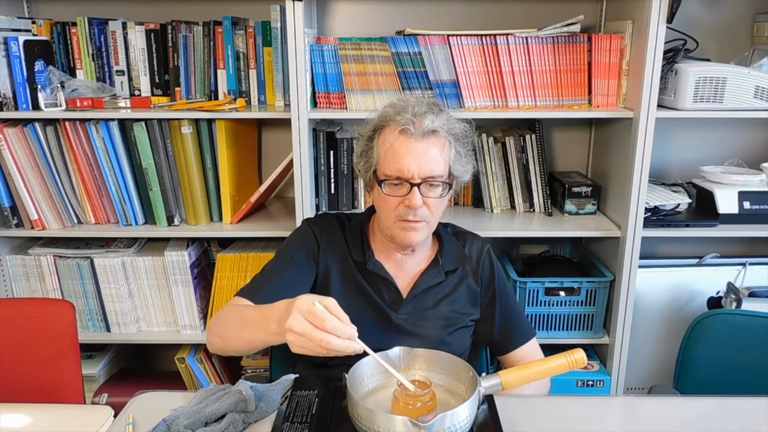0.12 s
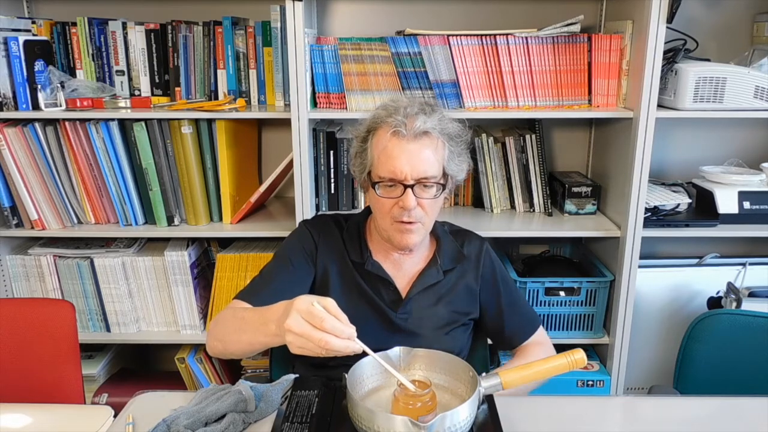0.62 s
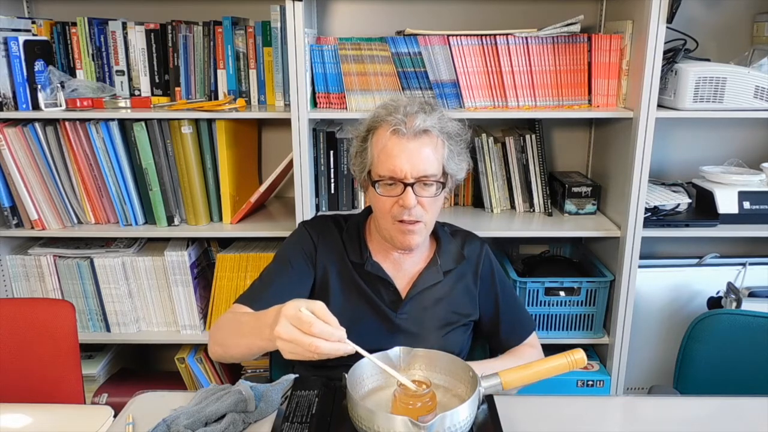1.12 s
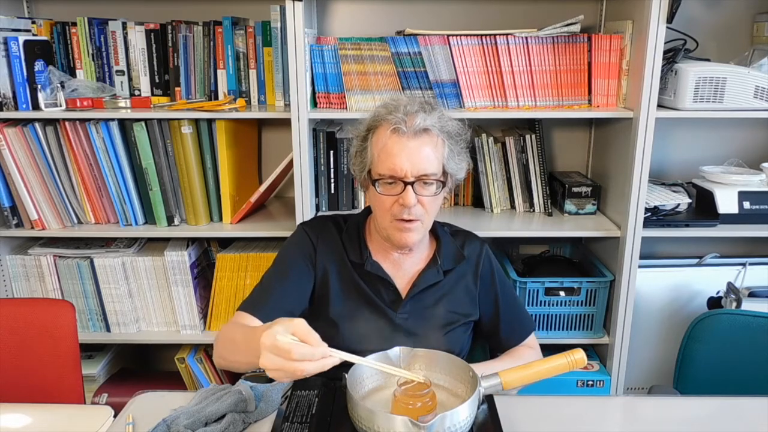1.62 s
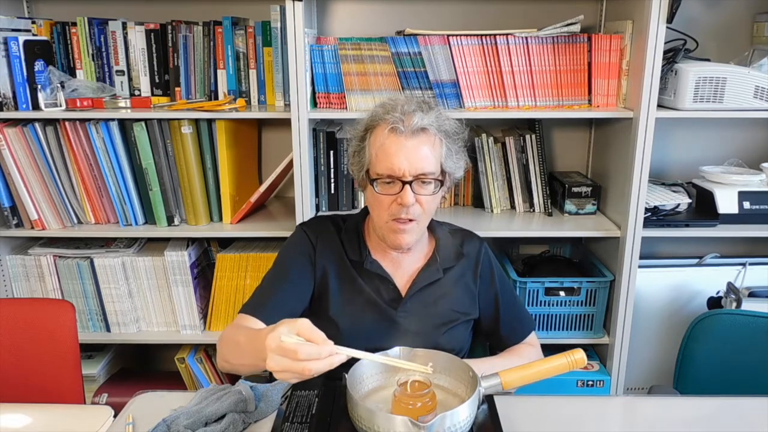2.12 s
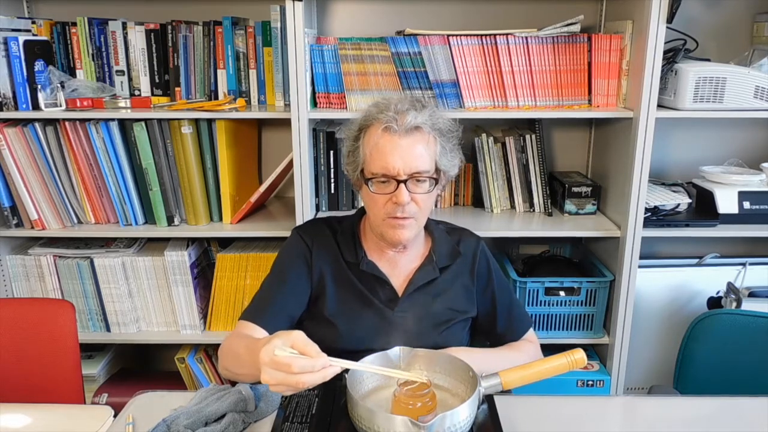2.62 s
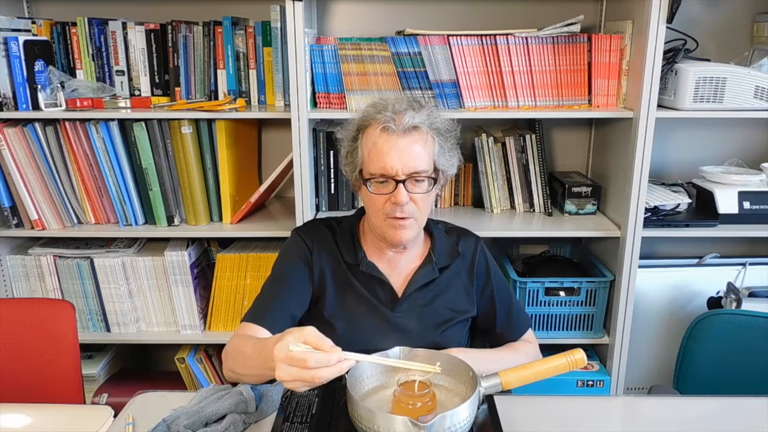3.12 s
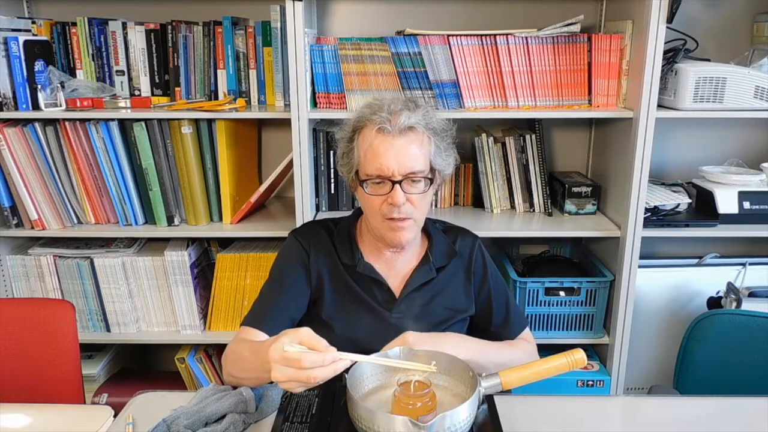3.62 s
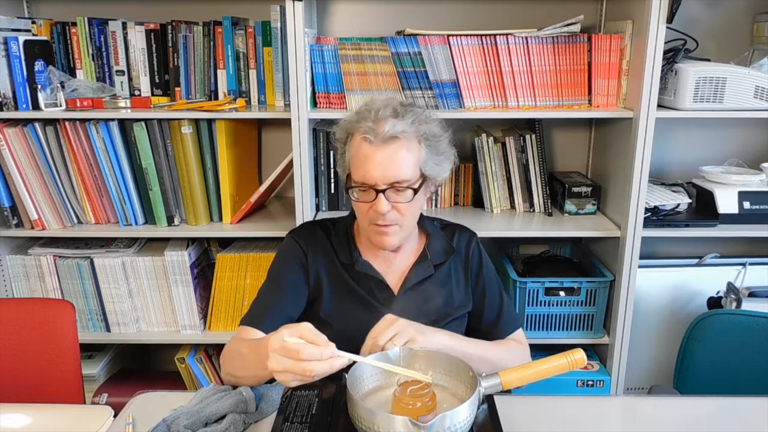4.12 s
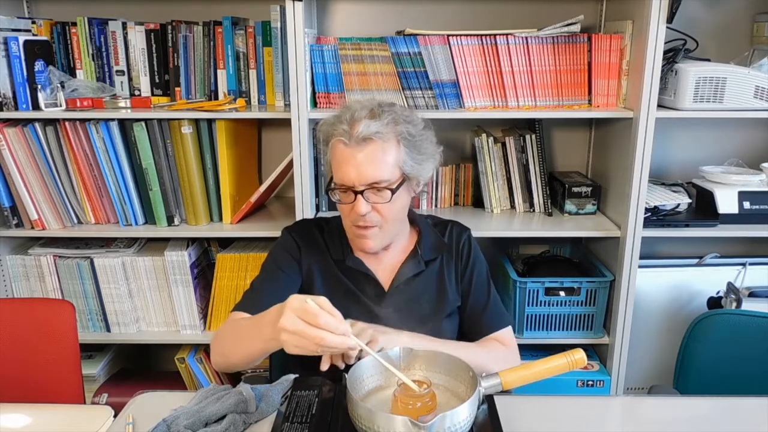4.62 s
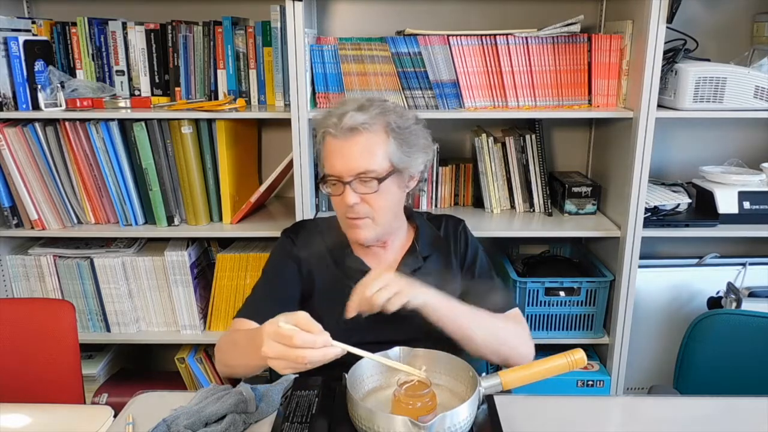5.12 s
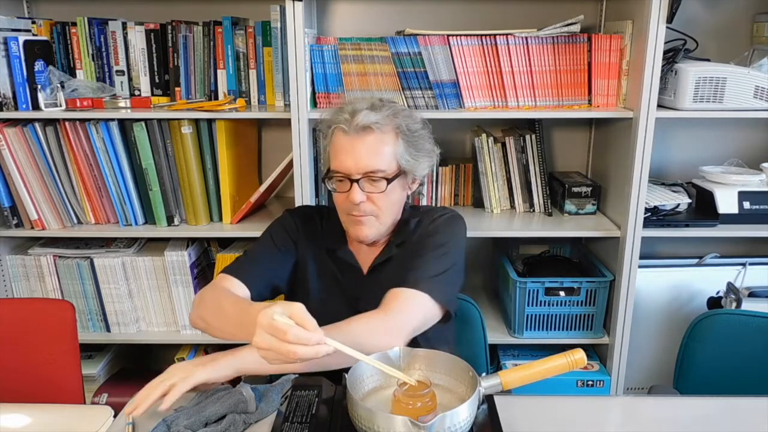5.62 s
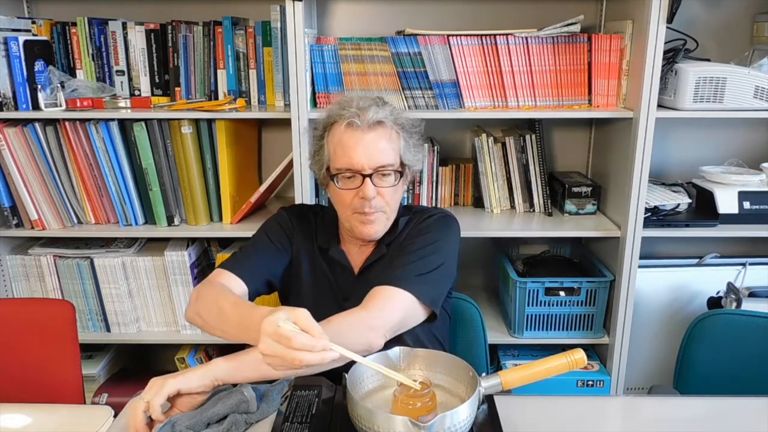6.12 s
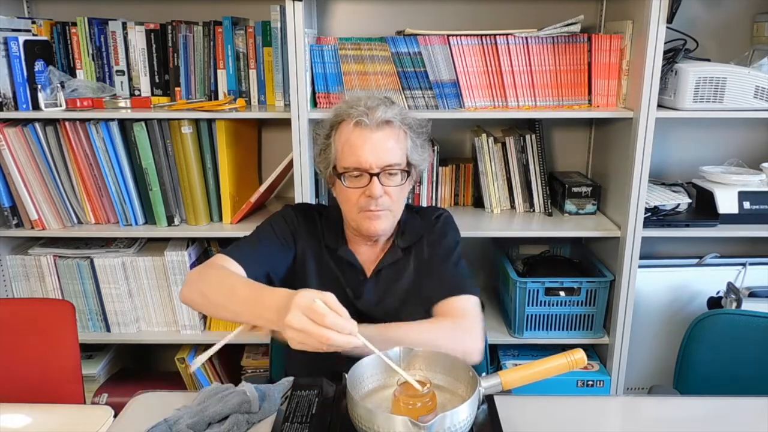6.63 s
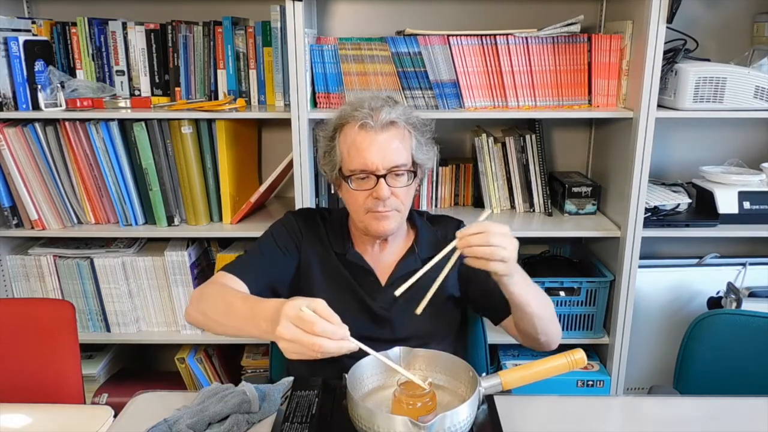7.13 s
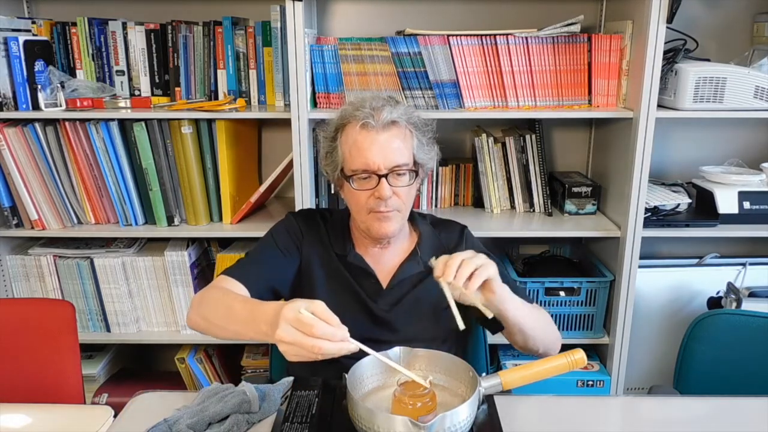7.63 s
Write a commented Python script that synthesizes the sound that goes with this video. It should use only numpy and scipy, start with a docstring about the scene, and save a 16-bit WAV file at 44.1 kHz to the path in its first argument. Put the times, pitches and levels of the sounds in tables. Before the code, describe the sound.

Steady bubbling and soft burner hiss fill the sound, close and dry with a slight small-room reflection. Irregular watery plops, dull pot clinks and crisp little spits stand out, liveliest near four seconds. Faint hum and room rumble lie underneath. At about six seconds wooden chopsticks tap the desk and a deep, almost subsonic flutter swells, then fades as a quick run of plops comes around seven seconds.

```python
"""Bubbles plop and droplets spit over the hiss of a gas flame: water simmers in a thin metal pot
on a small stove, close to a two-port camera microphone. Damped tones make the bubbles and taps,
noise bursts the spits, shaped noise the flame; a bank of modes rings as the pot. A machine hums in
the rumbling room, a hand knocks chopsticks on the desk, and late on comes a very low wobble."""
import sys
import numpy as np
from scipy import signal
from scipy.fft import rfft, irfft, next_fast_len
from scipy.io import wavfile
from scipy.ndimage import uniform_filter1d

SR = 44100
rng = np.random.default_rng(int(sys.argv[2]) if len(sys.argv) > 2 else 0)


def digitize_waveform(pressure):
    """Quantize a signal to 16-bit integers and store it at the path in sys.argv[1].

    Rows of a 2-D input are taken as channels; values are limited to [-1, 1].
    """
    field = np.atleast_2d(pressure).T
    bounded = np.clip(field, -1, 1)
    quanta = np.round(bounded * 32767).astype(np.int16)
    wavfile.write(sys.argv[1], SR, quanta)


def gain_from_db(level_db):
    """Convert decibel levels to linear amplitude factors (20 dB per decade)."""
    decades = np.asarray(level_db, float) / 20
    return 10 ** decades


N = 341803  # length in samples
SIZE = next_fast_len(N)
HZ = np.fft.rfftfreq(SIZE, 1 / SR)
T = np.arange(N) / SR


def evened(x):
    """Scales to rms 1."""
    return x / np.sqrt(np.mean(x ** 2) + 1e-20)


def read(points, hz):
    """Reads a curve of (Hz, value) points on a log frequency axis."""
    point_hz, value = np.transpose(points)
    return np.interp(np.log(hz + 1), np.log(point_hz + 1), value)


def add(mix, s, sound):
    """Mixes a sound in at s seconds."""
    part = mix[round(s * SR):][:len(sound)]
    part += sound[:len(part)]


def coloured(x, db):
    """Weights the whole spectrum of x by a gain in dB for each frequency of HZ."""
    return irfft(rfft(x, SIZE) * gain_from_db(db), SIZE)[..., :N]


def band(x, hz, octaves):
    """Passes a band of the given width around hz."""
    edges = hz * 2. ** np.array([-octaves / 2, octaves / 2])
    edges = np.clip(edges, 20, SR / 2.2)
    return signal.sosfilt(signal.butter(3, edges, "bandpass", fs=SR, output="sos"), x)


# vigour of the boil, used about its mean: start_s [s], level_db [dB]
BOIL_VIGOUR = [(0.0, -46.5), (1.55, -48.5), (1.75, -47), (3.32, -48), (3.91, -44), (4.9, -49.5), (5.1, -47),
               (5.44, -46), (5.89, -48.5), (6.06, -47.5), (6.54, -48.5), (7.75, -45)]


def vigour_db():
    """Level of the boil about its mean, sample by sample."""
    level_db = np.interp(T, *np.transpose(BOIL_VIGOUR))
    return level_db - level_db.mean()


# modes of the thin metal pot: pitch_hz [Hz], width_hz [Hz], level_db [dB over the broad colour]
POT_MODES = [(518, 47, 5.5), (650, 52, 5.5), (747, 44, 4), (1030, 61, 7.5), (1139, 29, 8), (1360, 59, 5),
             (1526, 34, 3.5), (1708, 13, 6.5), (2126, 165, 5), (2885, 55, 8.5), (2924, 30, 7),
             (3135, 80, 7.5), (3395, 40, 6.5), (3560, 28, 7), (3770, 35, 8.5), (3920, 69, 6.5),
             (6520, 45, -4), (6990, 110, 3), (8130, 120, 3.5), (5040, 38, 5)]


def pot_rings(x, ring_db):
    """The direct sound plus every resonance of the pot, signs alternating."""
    modes = 0
    for k, (hz, width, db) in enumerate(POT_MODES):
        modes = modes + (-1) ** k * gain_from_db(db) * width / (width + 2j * (HZ - hz))
    response = 1 + gain_from_db(ring_db) * modes
    return irfft(rfft(x, SIZE) * response, SIZE)[..., :N]


def bubble(hz, t60, glide):
    """A damped tone, rising for a positive glide as when a bubble nears the surface."""
    t = np.arange(round(t60 * SR) + 50) / SR
    envelope = (1 - np.exp(-t / 0.00096)) * gain_from_db(-60 * t / t60)
    return envelope * np.sin(2 * np.pi * hz * t * (1 + glide * t / t60))


def simmer(level_db=-55, per_s=14, spread_db=3, cycles=11):
    """Many small bubbles, mostly low, in clumps when the boil is lively; the pot rings with them."""
    out = np.zeros(N)
    chance = per_s / SR * gain_from_db(0.92 * vigour_db())  # per sample, at each of the 24 pitches
    for hz in np.geomspace(450, 2600, num=24):
        size = gain_from_db(spread_db * np.minimum(rng.exponential(1, N), 4))
        size = size * (rng.random(N) < chance)
        tone = bubble(hz, cycles / hz, 0.21) * (600 / hz) ** .5  # low ones are louder
        out += signal.oaconvolve(size, tone)[:N]
    return gain_from_db(level_db) * evened(pot_rings(out, -1.7))


# bubble plops, taps and clinks at the pot, with the body of the chopstick knocks:
# start_s [s], level_db [dB], pitch_hz [Hz], knock_db [dB], second_pitch_hz [Hz]
BLOWS = [(.115, -35, 1020, -19, 700), (.412, -41, 1110, -30, 4500), (.4215, -37, 1200, -22, 1800),
         (.432, -47, 2090, -31, 1300), (.934, -36, 1560, -35, 2370), (.941, -32, 1090, -35, 1520),
         (1.512, -31.5, 1450, -26, 900), (1.715, -31.5, 650, -29, 1680), (1.763, -35, 760, -29, 1100),
         (1.777, -38, 1660, -33, 780), (1.831, -35, 1030, -31, 1450), (1.885, -35, 1130, -38, 1500),
         (2.12, -29.5, 1495, -31, 2250), (2.121, -32, 673, -30, 990), (2.13, -43, 1470, -36, 2400),
         (2.2, -31, 1030, -26, 1510), (2.2015, -43, 2780, -33, 5180), (2.425, -37, 1454, -24, 1030),
         (2.524, -33, 685, -22, 1080), (3.705, -38.5, 1480, -34, 1040), (3.889, -36, 1000, -21, 1600),
         (4.05, -36, 3660, -24, 1990), (4.082, -32, 1030, -29, 1500), (4.969, -36, 1600, -28, 2430),
         (5.046, -40, 900, -25, 1450), (5.06, -34, 1000, -26, 1420), (5.177, -32, 910, -31, 650),
         (5.43, -37, 1430, -29, 1000), (5.47, -34, 980, -19, 630), (6.046, -42, 700, -26, 1540),
         (6.075, -44, 900, -27, 2570), (6.3, -38, 1030, -26, 1710), (6.902, -33, 770, -37, 1340),
         (7.062, -35, 1080, -24, 1550), (7.149, -31, 1100, -23.5, 1600), (7.25, -33, 700, -28, 1980),
         (7.345, -35, 1030, -24, 1850)]


def blows(t60=0.012, rise=0.0041, snap_db=11.5, reach=1.245, slosh_db=-13, slosh_t60=0.3):
    """Each rings at two pitches and knocks the pot: a snap, noise spanning both, a soft slosh."""
    tone, knock = np.zeros((2, N))
    t = np.arange(4000) / SR
    splash = gain_from_db(-60 * t / t60)
    slosh = gain_from_db(slosh_db - 60 * t / slosh_t60)
    envelope = (splash + slosh) * (1 - np.exp(-t / rise))
    for s, db, hz, knock_db, second_hz in BLOWS:
        burst = rng.standard_normal(len(t)) * envelope
        burst[20] += gain_from_db(snap_db)
        low, high = min(hz, second_hz) / reach, max(hz, second_hz) * reach
        add(tone, s, gain_from_db(db) * bubble(hz, .04, .07))
        add(tone, s, gain_from_db(db - 4.5) * bubble(second_hz, .025, .03))
        add(knock, s, gain_from_db(knock_db) * band(burst, np.sqrt(low * high), np.log2(high / low)))
    return tone + pot_rings(knock, -15.0)


# large spitting droplets, levels ahead of the band filters:
# start_s [s], level_db [dB], top_level_db [dB, the very top]
LARGE_SPITS = [(0.315, -32, -30), (1.4356, -32, -40), (2.2822, -32, -32), (2.9367, -33, -33),
               (3.0704, -27, -30), (3.3214, -28.5, -30), (3.744, -30, -31), (3.778, -26, -31),
               (5.242, -30, -38), (5.345, -31, -44), (5.627, -30, -40), (6.055, -39, -32),
               (6.2771, -37, -31), (7.666, -32, -34)]


def spits(small_db=-60, per_s=90, spread_db=27.0, tail_db=-13):
    """Droplets burst on hot metal: large sharp ticks and a fine random spray of softer puffs."""
    middle, top = np.zeros((2, N))
    t = np.arange(3000) / SR
    crack, sizzle = gain_from_db(-60 * t / 0.016), gain_from_db(tail_db - 60 * t / 0.05)
    envelope = (crack + sizzle) * (1 - np.exp(-t / 0.001))
    for s, db, top_db in LARGE_SPITS:
        burst = rng.standard_normal(len(t)) * envelope
        add(middle, s, gain_from_db(db) * burst)
        add(top, s, gain_from_db(top_db) * burst)
    size = gain_from_db(spread_db * np.minimum(rng.exponential(1, N), 2))
    size = size * (rng.random(N) < per_s / SR)
    puff = gain_from_db(-60 * t / 0.03) * (1 - np.exp(-t / 0.004))
    spray = signal.oaconvolve(size, puff)[:N] * rng.standard_normal(N)
    puffs = gain_from_db(small_db) * evened(spray)
    ringing = pot_rings(band(middle + puffs, 7830, 0.69), 3)
    return ringing + band(top + gain_from_db(4.0) * puffs, 11470, 0.55)


def bursts(frames, smooth):
    """A rough random course of smoothed squared exponential draws, capped at 2.5."""
    return np.minimum(evened(uniform_filter1d(rng.exponential(1, frames) ** 2 - 2, size=smooth)), 2.5)


# broad colour of flame hiss and simmer, shape only: pitch_hz [Hz], level_db [dB per Hz]
HISS_COLOUR = [(110, -66), (190, -6), (295, -10), (410, -5), (465, -13), (700, -12.5), (1230, -18.5),
               (2600, -25.5), (3300, -27), (4300, -27), (5700, -28.5), (7200, -22), (10000, -28),
               (11000, -32.5), (12200, -26), (15600, -53)]


def hiss(level_db=-44, patchy_db=1.5, flicker_db=1.38, churn_db=1.6, follow=0.92, boil_hz=2000):
    """Noise with drifting patches; its lows swell with the boil, its top flickers at random."""
    frames, hz = N // 64 + 5, np.fft.rfftfreq(256, 1 / SR)[:, None]
    draw = rng.standard_normal((frames, 129, 5)).T
    patches = uniform_filter1d(draw[4], size=5, axis=0)  # across frequency
    patches = evened(uniform_filter1d(patches, size=20, axis=1))  # along time
    flicker = bursts(frames, 8)
    churn = bursts(frames, 10)  # the lows flicker at random in rough bursts
    swell_db = np.interp(np.arange(frames) * 64, np.arange(N), vigour_db())
    low = 1 / (1 + (hz / boil_hz) ** 2)
    low_gain_db = low * (follow * swell_db + churn_db * churn * (hz > 400))
    flicker_gain_db = flicker_db * (1 - low) * flicker
    field = gain_from_db(patchy_db * patches + low_gain_db + flicker_gain_db)
    spectra = (draw[:2] + 1j * draw[2:4]) * field
    noise = signal.istft(spectra, nperseg=256, noverlap=192)[1][:, :N]
    # the pot's modes stand out as humps of power
    humps = sum((gain_from_db(db) ** 2 - 1) / (1 + (2 * (HZ - f) / width) ** 2) for f, width, db in POT_MODES)
    tone_db = read(HISS_COLOUR, HZ) + 10 * np.log10(np.maximum(1 + humps, .01))
    return gain_from_db(level_db) * evened(coloured(ports(*noise), tone_db))


# modes of the chopsticks: pitch_hz [Hz], level_db [dB], end_share [share of the end-strike boost]
STICK_MODES = [(860, 3, 0), (1250, 0, 0), (1780, 0, 1), (2970, -8, -.5), (4450, -8, 0), (6520, -8, 0)]
# knocks on the desk: start_s [s], level_db [dB], end_db [dB, boost of the end-struck modes]
STICK_KNOCKS = [(6.0443, -28, -14), (6.0718, -37, 9), (6.0788, -38, 9)]


def taps(t60=.017):
    """Chopsticks on the desk: a click and the short dry modes of the wood."""
    out = np.zeros(N)
    for s, db, end_db in STICK_KNOCKS:
        for hz, mode_db, end_share in STICK_MODES:
            add(out, s, gain_from_db(db) * gain_from_db(mode_db + end_share * end_db) * bubble(hz, t60, 0))
        add(out, s, gain_from_db(db) * np.array([1, -1]))
    return out


# course of the late wobble: start_s [s], level_db [dB], left_right_db [dB]
WOBBLE_COURSE = [(5.7, -39, 0), (5.82, -28.5, -9), (5.87, -22, 1), (6.02, -10, 4), (6.14, -22, 3),
                 (6.25, -21, -9), (6.5, -24.5, 11), (6.6, -36.5, 7), (6.78, -36, -12), (6.9, -31, 17),
                 (7.25, -32, 14), (7.45, -42, 3), (7.75, -25, 8)]
# colour of the wobble, shape only: pitch_hz [Hz], level_db [dB per Hz]
WOBBLE_COLOUR = [(3, -14), (8, 0), (11, 0), (17, -7), (22, -15), (30, -26), (45, -50), (60, -90)]


def wobble(lumpy=.1, apart=.6):
    """Very low noise, partly its own at each port, whose swings follow the course closely."""
    s, db, lean_db = np.transpose(WOBBLE_COURSE)
    both, own = rng.standard_normal((2, N))
    noise = np.array([both + apart * own, both - apart * own])
    swing = coloured(noise, read(WOBBLE_COLOUR, HZ))
    envelope = abs(signal.hilbert(swing, SIZE)[:, :N])
    swing = evened(swing / envelope ** (1 - lumpy))  # lumpy 0 is flat, 1 leaves the swings as drawn
    level_db = np.interp(T, s, db, left=-90)
    side_db = np.interp(T, s, lean_db) / 2
    swing = swing * gain_from_db(level_db + np.array([side_db, -side_db]))
    return coloured(swing, -.12 * np.maximum(HZ - 17, 0) ** 2)  # keeps only the lowest frequencies


# steady tones of a machine and a whistle of the gas jet:
# pitch_hz [Hz], level_db [dB], width_hz [Hz], left_right_db [dB]
STEADY_TONES = [(58.3, -47.5, .5, 5), (360, -48.7, .4, 8), (5270, -71, 25, 0), (10524, -68, 50, 0)]


def tones():
    """Sines whose phase wanders at random, which gives each its width."""
    out = np.zeros((2, N))
    for hz, db, width, lean_db in STEADY_TONES:
        wander = np.cumsum(rng.standard_normal(N)) * np.sqrt(2 * np.pi * abs(width) / SR)
        level = gain_from_db(db + np.array([[lean_db / 2], [-lean_db / 2]]))
        out += level * np.sqrt(2) * np.sin(2 * np.pi * hz * T + wander)
    return out


# low rumble of the room, peaked at its deepest modes, shape only: pitch_hz [Hz], level_db [dB per Hz]
ROOM_COLOUR = [(2, 9.5), (6, -33), (16, -7), (23, -6), (33, -2.5), (41, 0.5), (54, 1), (63, -14), (74, -15),
               (85, -13.5), (96, 1.5), (110, -7), (130, -11.5), (155, -9), (185, -17), (290, -40.5)]


def rumble(level_db=-39.5):
    """Low room noise, shaped by the room's deepest modes."""
    noise = ports(*rng.standard_normal((2, N)))
    return gain_from_db(level_db) * evened(coloured(noise, read(ROOM_COLOUR, HZ)))


def echoes(x, t60):
    """The small room: sparse echoes of random sign that die away."""
    t = np.arange(SR // 2) / SR
    signs = rng.choice([-1., 0, 1.], len(t), p=[.03, .94, .03])
    reflections = signs * gain_from_db(-60 * t / t60) * (t > .004)
    return signal.oaconvolve(x, reflections / np.linalg.norm(reflections))[:N]


# likeness of the two microphone ports: pitch_hz [Hz], likeness [0 to 1]
PORT_LIKENESS = [(40, .1), (80, .2), (130, .72), (290, .78), (640, .83), (1400, .87), (3100, .84),
                 (5500, .68), (8000, .45), (15000, .42)]
# phase by which the left port leads: pitch_hz [Hz], lead_rad [radians]
PORT_LEAD = [(600, -.1), (4000, -.2), (5300, -.7), (7500, -.5), (10500, -1.5), (13000, -.6)]
# balance of the ports: pitch_hz [Hz], left_right_db [dB]
PORT_BALANCE = [(60, -0.5), (100, -2.5), (200, 3), (450, 0), (15000, 0.3)]


def ports(near, other):
    """The right port hears the near sound in part, phase-shifted, and fills up with other sound."""
    same = np.clip(read(PORT_LIKENESS, HZ), 0, 1)
    left = rfft(near, SIZE)
    shared = same * left * np.exp(-1j * read(PORT_LEAD, HZ))
    right = shared + np.sqrt(1 - same ** 2) * rfft(other, SIZE)
    lean = gain_from_db(read(PORT_BALANCE, HZ) / 2)
    return irfft([left * lean, right / lean], SIZE)[:, :N]


def scene():
    """Pot and chopsticks with their echoes reach both ports; hiss, hum, rumble and wobble join."""
    close = simmer() + blows() + spits() + taps()
    near = close + gain_from_db(-10) * echoes(close, t60=.2)
    at_ports = ports(near, echoes(close, t60=0.063))
    return at_ports + hiss() + tones() + rumble() + wobble()


def roll_off(x):
    """The treble ends steeply here."""
    return signal.sosfilt(signal.butter(12, 15730, fs=SR, output="sos"), x)


def record(dry):
    """The microphone signal is cut by 120 dB above 15750 Hz."""
    mix = coloured(dry, -120. * (HZ > 15750))
    return roll_off(mix)


dry = scene()
out = record(dry)
digitize_waveform(out)
```